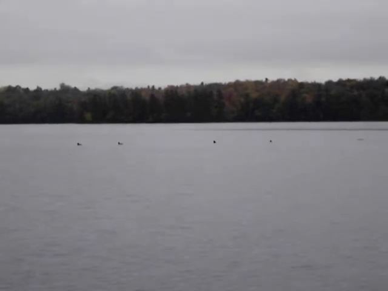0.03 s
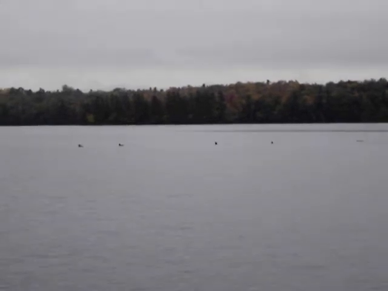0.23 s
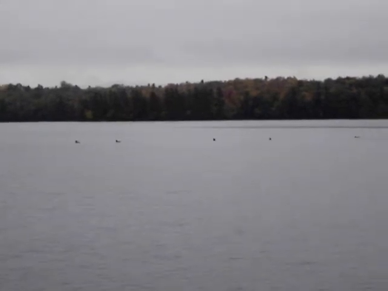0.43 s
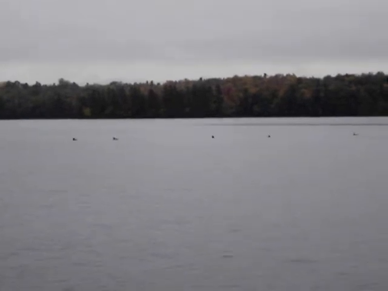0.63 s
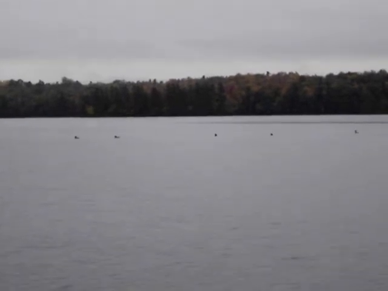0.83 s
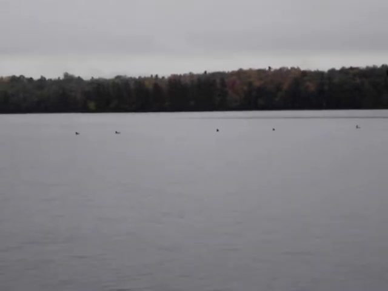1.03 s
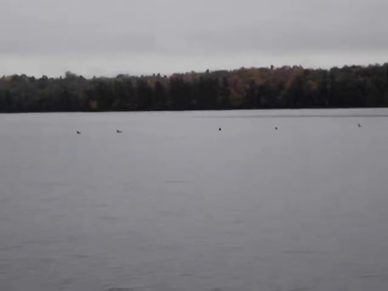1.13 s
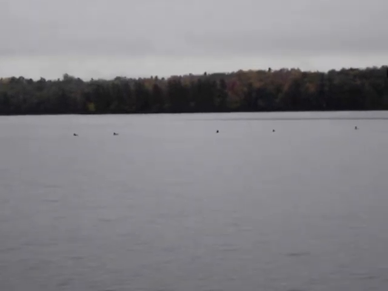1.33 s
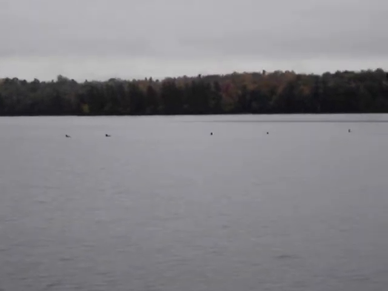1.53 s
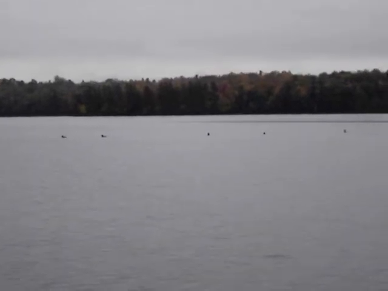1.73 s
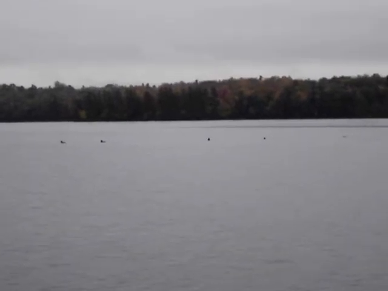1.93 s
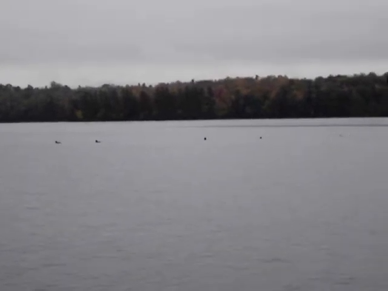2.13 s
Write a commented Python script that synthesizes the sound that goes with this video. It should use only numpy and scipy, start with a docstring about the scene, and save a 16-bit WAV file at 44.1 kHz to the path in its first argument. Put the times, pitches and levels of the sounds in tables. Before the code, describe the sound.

A loon calls far across a quiet lake in the second half: low note, five quick pitch arches, soft drop. Before and under it, a close camera lens motor chatters and ticks, with wind bumping the microphone.

```python
"""Throughout: gusts rumble and bump on a microphone over steady hiss and a faint whine (shaped noise, sines).
From the start a near lens motor chatters and ticks: hits ring damped modes, shaped noise adds the rattle.
From 1.2 s a far loon calls over a quiet lake: a faint yelp, a low two-partial note, a tremolo of five pitch
arches, a soft drop back, all from a sine and its octave. The motor stops during the drop; clicks follow.
The recorder mirrors the midrange faintly into the treble and cuts the top."""
import sys
import numpy as np
from scipy import signal
from scipy.fft import rfft, irfft
from scipy.io import wavfile

SR = 44100
rng = np.random.default_rng(int(sys.argv[2]) if len(sys.argv) > 2 else 0)


def dump_mix(stems):
    """Bounce the given channels to the path in sys.argv[1] as a 16-bit WAV at rate SR."""
    frames = np.atleast_2d(stems).T  # one column per channel
    limited = np.clip(frames, -1, 1)  # hard clip at full scale
    pcm = np.round(limited * 32767).astype(np.int16)
    wavfile.write(sys.argv[1], SR, pcm)


N = 97020
T = np.arange(N) / SR   # s

# Wind level curve before WIND_OFFSET_DB: [t/s, level/dB]
GUSTS = [(0, -70), (.06, -45.5), (.11, -42.5), (.15, -54), (.24, -48.5), (.31, -62), (.345, -38.5),
         (.38, -36.5), (.43, -57), (.58, -48), (.66, -51), (.74, -38.5), (.8, -48), (.87, -38.5),
         (1.0, -61.5), (1.06, -48.5), (1.17, -69), (1.29, -42.5), (1.35, -56), (1.425, -45), (1.5, -53.5),
         (1.85, -77), (2.06, -50.5), (2.2, -57.5)]
# Wind spectrum shape: [f/Hz, relative density/dB per Hz]
WIND_SPECTRUM = [(15, -28), (30, -4), (55, 1.5), (100, -4.5), (160, -20.5), (300, -24.5), (2000, -58)]
WIND_OFFSET_DB = 0.5
# Soft air bumps on the microphone: [t/s, level/dB]
BUMPS = [(.337, -27.5), (.365, -30), (0.618, -34), (.722, -33), (.85, -35), (2.044, -28.5)]
# Decaying mode of a bump: [f/Hz, relative level/dB, t60/s]
BUMP_MODE = [(70.6, 0, 0.037)]
BUMP_ATTACK_S = 0.00077
# Air and hiss spectrum shape: [f/Hz, relative density/dB per Hz]
HISS_SPECTRUM = [(30, -1), (140, -0.5), (260, -4.5), (500, -7.5), (1100, -9), (2000, -15.5), (4000, -19.5),
                 (7000, -22), (9900, -24), (10150, -37), (15500, -34.5)]
HISS_DB = -50
# Faint electronic whine: [f/Hz, rms level/dB]
WHINE_TONES = [(4001, -81), (8002, -77), (8032, -82)]

# Motor movement spans: [start/s, end/s]
MOTOR_RUNS = [(0, 0.28), (.31, .925), (.97, 1.16), (1.2, 1.81)]
STEPS_PER_S = 59.94
# Damped modes of a fine tick: [f/Hz, relative level/dB, t60/s]
TICK_MODES = [(3087, -2, 0.011), (4290, -9.5, 0.015)]
# Ticks that stand out: [t/s]
LOUD_TICKS = [.098, .165, .198, .298, .932, 1.065, 1.132, 1.165, 1.332, 1.432, 1.466, 1.532, 1.733, 1.8]
FIRST_TICK_S, TICK_JITTER_S, TICK_ATTACK_S = 0.0292, 0.0003, 0.0012
TICK_DB, OFFBEAT_DB, TICK_SPREAD_DB, LOUD_TICK_DB = -40, -3, 2.5, -34
TICK_DETUNE = 0.017   # relative pitch spread from hit to hit

# Louder motor knocks: [t/s, level/dB]
KNOCKS = [(0.045, -38.5), (0.113, -41.5), (.174, -43), (.234, -37.5), (0.316, -34.5), (0.333, -37),
          (.351, -41), (.368, -36), (.401, -38), (0.444, -32), (0.464, -36.5), (0.499, -39.5), (0.514, -37),
          (0.532, -35.5), (0.545, -40.5), (0.599, -34), (0.648, -37.5), (.666, -32.5), (0.682, -37),
          (0.731, -34), (0.802, -36), (0.865, -34), (0.977, -35.5), (1.035, -35), (1.047, -34), (1.08, -36),
          (1.134, -36.5), (1.201, -34)]
# Damped modes of the housing: [f/Hz, relative level/dB, t60/s]
HOUSING_MODES = [(792.5, 7, 0.033), (840, 8, 0.0051), (1112, -9.5, 0.041), (1580, -9, 0.0063)]
# Short gear rattles: [t/s, level/dB, length/s]
RATTLES = [(0.045, -49.5, 0.015), (.172, -51, 0.017), (0.232, -46.5, 0.025), (.544, -42.5, 0.012),
           (0.601, -51, 0.013), (0.667, -47, 0.02), (.745, -47, .011), (1.034, -45, .022),
           (1.132, -48, 0.021)]
# Gear rattle spectrum shape: [f/Hz, relative density/dB per Hz]
RATTLE_SPECTRUM = [(150, 4), (400, 4), (650, 3.5), (900, 5.5), (1500, 0.5), (2200, -13), (5000, -16),
                   (9000, -26), (16000, -65)]
STEP_DB, STEP_SPREAD_DB = -43, 6
SCUFF_REL_DB = -13.5   # noise of a hit, relative to its level
SCUFF_S, RATTLE_EDGE_S = 0.0034, 0.0034
CONTACT_S = 0.0037     # time constant of the ring's build-up
HOUSING_DETUNE = 0.03  # relative pitch spread from hit to hit

# Sharp clicks of the mechanism: [t/s, level/dB, top edge f/Hz, ring level/dB]
CLICKS = [(.1215, -36.5, 3000, -54), (.869, -37, 5960, -50), (1.881, -38, 7450, -33),
          (1.9536, -40.5, 3240, -50)]
CLICK_DECAY_S, CLICK_LOW_HZ = 0.0017, 750

# Faint first yelp: [t/s, f/Hz, fundamental level/dB, octave level/dB]
YELP = [(1.211, 730, -53, -53), (1.218, 661, -50, -48.5), (1.226, 616, -59, -53)]
# Low note before the tremolo: [t/s, f/Hz, fundamental level/dB, octave level/dB]
OPENING = [(1.238, 684, -66, -51), (1.25, 637, -42.5, -48), (1.262, 618, -55.5, -56),
           (1.274, 661, -41, -44.5), (1.292, 750, -39, -34), (1.312, 788, -35, -36),
           (1.325, 799, -36, -41.5), (1.337, 766, -41, -47), (1.349, 745, -49, -64)]
# Tremolo arches: [top t/s, top f/Hz, level/dB before dip and break losses, rise/s, fall/s]
ARCHES = [(1.393, 1178, -29, 0.041, .035), (1.478, 1181, -29, .038, 0.034),
          (1.563, 1170, -29, 0.037, 0.035), (1.650, 1161, -29, .039, 0.033),
          (1.74, 1128, -29.5, 0.034, 0.031)]
# Low note after the tremolo: [t/s, f/Hz, fundamental level/dB, octave level/dB]
CLOSING = [(1.793, 637.6, -42, -55), (1.808, 655.4, -43, -52), (1.824, 719, -38.5, -51),
           (1.837, 747, -43, -50), (1.847, 812, -47.5, -68), (1.859, 703, -43.5, -52),
           (1.871, 620, -45, -54), (1.886, 560, -53, -62)]
TREMOLO_START_S, TREMOLO_END_S, TREMOLO_EDGE_S, NOTE_EDGE_S = 1.342, 1.792, 0.0091, 0.0052
ARCH_DEPTH_HZ, ARCH_POWER = 225.5, 2.3   # pitch drop one rise or fall time from the top
DIP_HZ, DIP_SAG_HZ_PER_S = 965, 250      # pitch floor at tremolo start, and its sinking
FULL_VOICE_HZ, DIP_LOSS_DB = 155, 6.5    # the voice weakens closer than this to the floor
BREAK_DB, BREAK_S, BREAK_LAG_S = 4.5, 0.0034, 0.00091   # brief catch at each arch's foot
OVERTONE_REL_DB, OVERTONE_FADE_DB_PER_HZ = -31.5, 0.08  # octave, fading below the top pitch
JITTER, SHIMMER_DB = 0.0016, 0.76        # rms wander of relative pitch and of level

# Tones around which the recorder mirrors the midrange: [f/Hz, image level/dB]
MIRRORS = [(4300, -40.5), (7830, -40), (12098, -29.5), (15700, -46), (16400, -42)]
MIRROR_LOW_HZ, CUTOFF_HZ = 580, 15720


def from_db(db):
    """Decibels to gain."""
    return 10 ** (np.asarray(db) / 20)


def rms_one(x):
    """Scale to unit rms."""
    return x / np.sqrt(np.mean(x ** 2) + 1e-20)


def in_time(rows):
    """Interpolate a table's columns over its first, time, at every sample."""
    s, *columns = np.transpose(rows)
    return [np.interp(T, s, column) for column in columns]


def noise(spectrum):
    """Unit-rms Gaussian noise shaped by a spectrum, interpolated over log frequency."""
    hz, db = np.transpose(spectrum)
    bins_hz = np.maximum(np.fft.rfftfreq(N, 1 / SR), 1)
    gain = from_db(np.interp(np.log(bins_hz), np.log(hz), db))
    return rms_one(irfft(rfft(rng.standard_normal(N)) * gain, N))


def drift(cutoff_hz):
    """Unit-rms low-passed random wander, filter start-up discarded."""
    lowpass = signal.butter(2, cutoff_hz, fs=SR, output="sos")
    return rms_one(signal.sosfilt(lowpass, rng.standard_normal(2 * N))[N:])


def gate(start_s, end_s, edge_s):
    """On between two times, with linear ramps."""
    return np.clip(np.minimum(T - start_s, end_s - T) / edge_s, 0, 1)


def swell(start_s, length_s):
    """Rise to 1 at half the length, then a slower fall."""
    age = np.clip(2 * (T - start_s) / length_s, 0, 20)
    return age * np.exp(1 - age)


def burst(start_s, decay_s):
    """Sudden start, exponential decay."""
    return (T >= start_s) * np.exp(-np.clip((T - start_s) / decay_s, 0, 20))


def ring(times_s, levels_db, modes, attack_s, detune=0):
    """Each hit excites all damped modes, shifted together in pitch; the ring builds up, then decays."""
    t = T[:SR // 8]
    attack = 1 - np.exp(-t / attack_s)
    out = np.zeros(N + SR)
    stretches = 1 + detune * rng.standard_normal(len(times_s))
    for s, level_db, stretch in zip(times_s, levels_db, stretches):
        response = 0
        for hz, db, t60_s in modes:
            decay = from_db(level_db + db - 60 * t / t60_s)
            response = response + decay * np.sin(2 * np.pi * hz * stretch * t)
        first = max(int(s * SR), 0)
        out[first:first + len(t)] += response * attack
    return out[:N]


def wind():
    """Gusts modulate low noise; bumps ring one low damped mode."""
    gust_db, = in_time(GUSTS)
    rumble = from_db(WIND_OFFSET_DB + gust_db) * noise(WIND_SPECTRUM)
    return rumble + ring(*np.transpose(BUMPS), BUMP_MODE, BUMP_ATTACK_S)


def hiss():
    """Steady shaped noise."""
    return from_db(HISS_DB) * noise(HISS_SPECTRUM)


def whine():
    """Steady sines."""
    return sum(np.sqrt(2) * from_db(db) * np.sin(2 * np.pi * hz * T) for hz, db in WHINE_TONES)


def motor_ticks():
    """Ticks at the step rate ring high damped modes, strong and weak in turn; some stand out."""
    times_s = np.arange(FIRST_TICK_S, MOTOR_RUNS[-1][1], 1 / STEPS_PER_S)
    count = len(times_s)
    spread_db = TICK_SPREAD_DB * (2 * rng.random(count) - 1)
    db = TICK_DB + OFFBEAT_DB * (np.arange(count) % 2) + spread_db
    loud = np.abs(times_s[:, None] - LOUD_TICKS).min(axis=1) < 0.5 / STEPS_PER_S
    levels_db = np.where(loud, LOUD_TICK_DB, db)
    jittered_s = times_s + TICK_JITTER_S * rng.standard_normal(count)
    return ring(jittered_s, levels_db, TICK_MODES, TICK_ATTACK_S, TICK_DETUNE)


def lens_motor():
    """Uneven steps in runs and louder knocks ring the housing and scuff; the gears rattle as noise."""
    grid_s = np.arange(0, T[-1], 1 / STEPS_PER_S)
    steps_s = [s for s in grid_s if any(start <= s < end for start, end in MOTOR_RUNS)]
    steps_db = STEP_DB + STEP_SPREAD_DB * (2 * rng.random(len(steps_s)) - 1)
    knocks_s = np.array(KNOCKS)[:, 0]
    hits = list(KNOCKS)
    for s, db in zip(steps_s, steps_db):
        if np.abs(knocks_s - s).min() > 0.5 / STEPS_PER_S:   # a knock replaces its step
            hits.append((s, db))
    scuffs = sum(from_db(db + SCUFF_REL_DB) * swell(s, SCUFF_S) for s, db in hits)
    rattles = sum(from_db(db) * gate(s, s + length_s, RATTLE_EDGE_S) for s, db, length_s in RATTLES)
    housing = ring(*np.transpose(hits), HOUSING_MODES, CONTACT_S, HOUSING_DETUNE)
    return housing + (scuffs + rattles) * noise(RATTLE_SPECTRUM)


def clicks():
    """Decaying bursts of band-limited noise, each with some of the tick's ring."""
    snaps = 0
    for s, db, top_hz, _ in CLICKS:
        band = signal.butter(4, [CLICK_LOW_HZ, top_hz], "band", fs=SR, output="sos")
        grain = rms_one(signal.sosfilt(band, rng.standard_normal(N)))
        snaps = snaps + from_db(db) * burst(s, CLICK_DECAY_S) * grain
    times_s, _, _, ring_db = np.transpose(CLICKS)
    return snaps + ring(times_s, ring_db, TICK_MODES, TICK_ATTACK_S)


def voice(hz, fundamental_db, octave_db):
    """Sine and octave with shared pitch jitter and level shimmer."""
    phase = 2 * np.pi * np.cumsum(hz * (1 + JITTER * drift(150))) / SR
    shimmer = from_db(SHIMMER_DB * drift(152))
    partials = from_db(fundamental_db) * np.sin(phase) + from_db(octave_db) * np.sin(2 * phase)
    return np.sqrt(2) * shimmer * partials


def low_note(note):
    """The voice follows a table of pitch and partial levels."""
    return voice(*in_time(note)) * gate(note[0][0], note[-1][0], NOTE_EDGE_S)


def tremolo():
    """Pitch arches over a sinking floor; the voice weakens near the floor and catches at each foot."""
    arches_hz = []
    for s, peak_hz, _, rise_s, fall_s in ARCHES:
        distance = np.maximum((s - T) / rise_s, (T - s) / fall_s)
        arches_hz.append(peak_hz - ARCH_DEPTH_HZ * distance ** ARCH_POWER)
    floor_hz = DIP_HZ - DIP_SAG_HZ_PER_S * (T - TREMOLO_START_S)
    hz = np.maximum(np.max(arches_hz, axis=0), floor_hz)
    top_hz, top_db, _, _ = in_time(ARCHES)
    weakness = np.clip(1 - (hz - floor_hz) / FULL_VOICE_HZ, 0, 1)
    breaks = sum(swell(s + fall_s + BREAK_LAG_S, BREAK_S) for s, _, _, _, fall_s in ARCHES)
    db = top_db - DIP_LOSS_DB * weakness - BREAK_DB * breaks
    octave_db = db + OVERTONE_REL_DB - OVERTONE_FADE_DB_PER_HZ * (top_hz - hz)
    return voice(hz, db, octave_db) * gate(TREMOLO_START_S, TREMOLO_END_S, TREMOLO_EDGE_S)


def loon():
    """Low two-partial notes before and after a nearly pure tremolo."""
    return low_note(YELP) + low_note(OPENING) + tremolo() + low_note(CLOSING)


def scene():
    """Air and whine, near motor, far bird, summed to one channel."""
    background = wind() + hiss() + whine()
    motor = motor_ticks() + lens_motor() + clicks()
    return (background + motor + loon())[None]


def record(dry):
    """Ring modulation adds faint mirror images of the midrange; a steep low-pass cuts the top."""
    highpass = signal.butter(4, MIRROR_LOW_HZ, "high", fs=SR, output="sos")
    midrange = signal.sosfilt(highpass, dry)
    carriers = sum(2 * from_db(db) * np.cos(2 * np.pi * hz * T) for hz, db in MIRRORS)
    lowpass = signal.ellip(12, 0.1, 80, CUTOFF_HZ, fs=SR, output="sos")
    return signal.sosfilt(lowpass, dry + midrange * carriers)


dry = scene()
out = record(dry)
dump_mix(out)
```